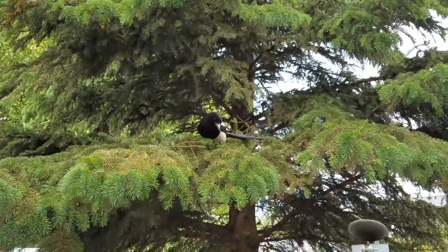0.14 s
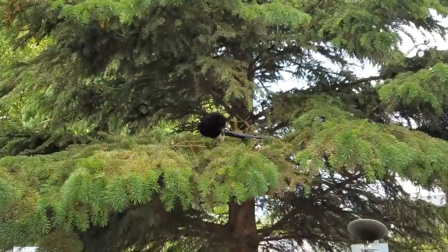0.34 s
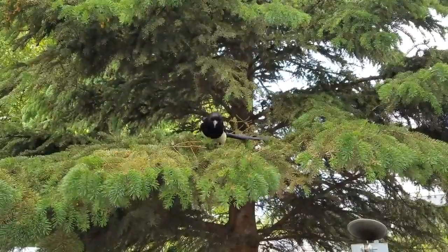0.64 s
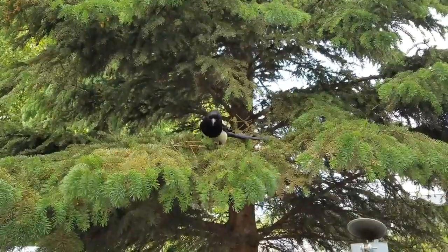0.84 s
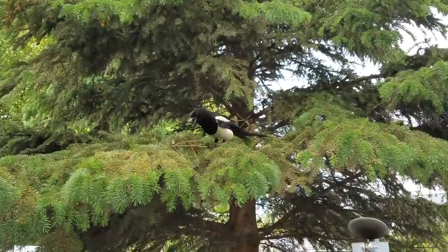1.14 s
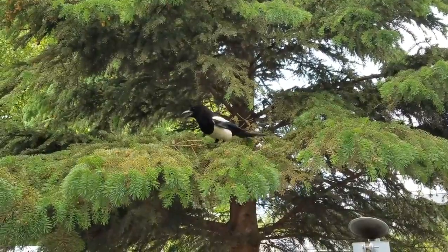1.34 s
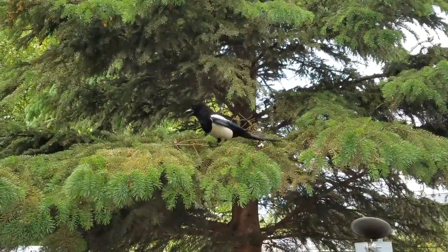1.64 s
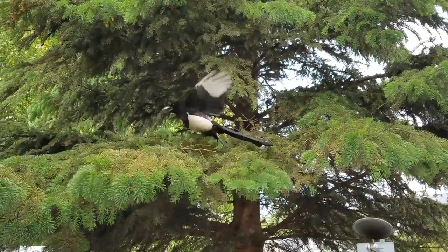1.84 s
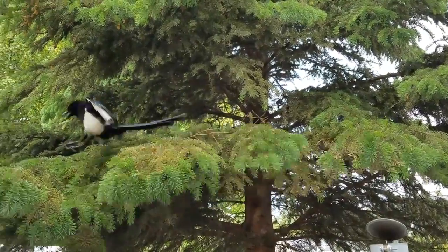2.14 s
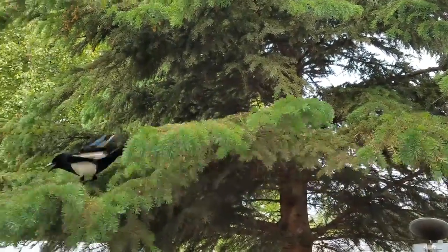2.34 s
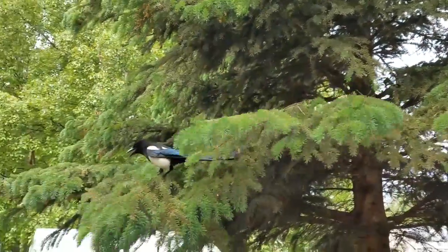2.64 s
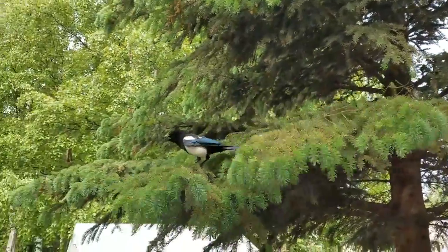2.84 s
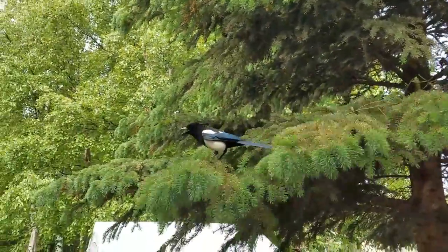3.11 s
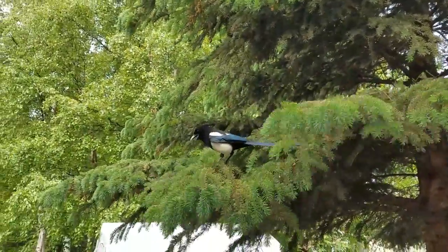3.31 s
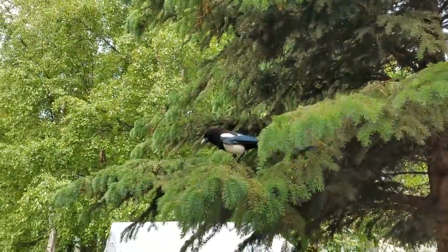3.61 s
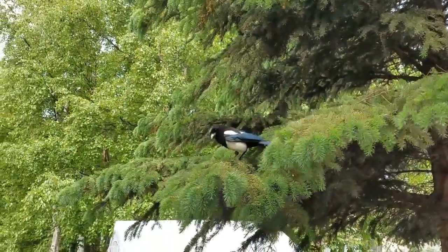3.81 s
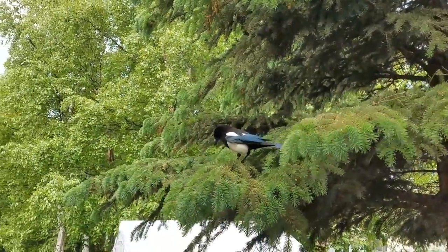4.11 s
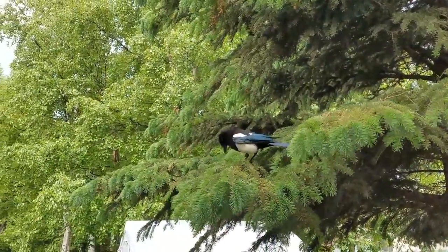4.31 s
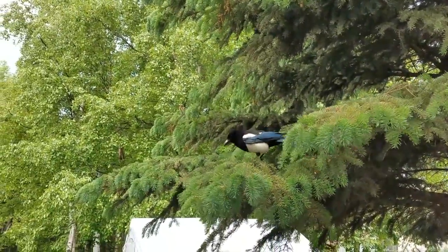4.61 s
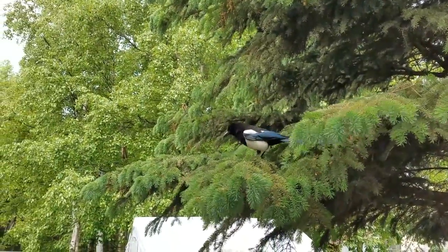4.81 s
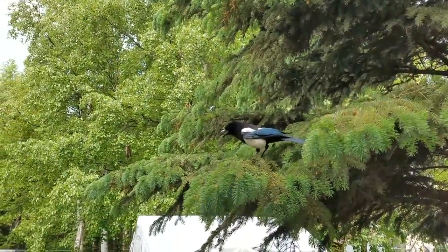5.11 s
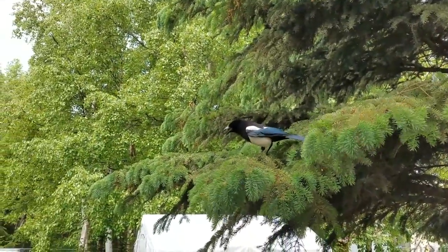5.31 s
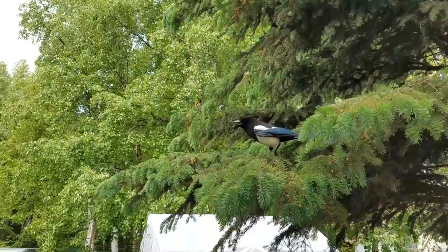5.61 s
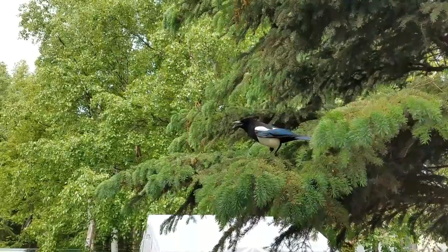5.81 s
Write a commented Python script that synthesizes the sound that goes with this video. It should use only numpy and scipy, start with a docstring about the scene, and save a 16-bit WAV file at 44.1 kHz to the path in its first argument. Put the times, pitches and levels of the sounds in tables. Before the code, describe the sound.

Quiet outdoor air with a faint low machine hum and a few tiny twig ticks. Soft breathy rasps begin just before a magpie breaks into eleven harsh, rattling calls at a steady quick pace. It stops for about a second and a half, leaving hum and background, then four more calls start and continue to the end. The microphone is at moderate distance in an open yard, with slight scatter from branches.

```python
"""A distant machine hums and twigs tick; soft rasps, perhaps from a second bird, soon join in.
Then a magpie chatters in a spruce: two runs of harsh calls, each a rattle rising into a hoarse tone.
Pulses and puffs of air drive throat resonances; the rasps use a breathier source, the ticks noise bursts.
Branches scatter the near sounds and the yard answers faintly as decaying reflections.
The machine is a bank of wavering tones, over an outdoor background of coloured noise."""
import sys
import numpy as np
from scipy import signal
from scipy.fft import rfft, irfft, next_fast_len
from scipy.io import wavfile
from scipy.ndimage import uniform_filter1d

SR = 44100
rng = np.random.default_rng(int(sys.argv[2]) if len(sys.argv) > 2 else 0)


def wav_out(sig):
    """Save sig, one row per channel (or a flat mono array), as 16-bit PCM at SR to the path in sys.argv[1]."""
    wavfile.write(sys.argv[1], SR, np.round(np.clip(np.atleast_2d(sig).T, -1, 1) * 32767).astype(np.int16))


N = 262395
TIME = np.arange(N) / SR
CALL_TIME = np.arange(0, .24, 1 / SR)

# The magpie's calls. Each row: start in seconds, build-up time of the air pressure in seconds,
# time to the top of the pitch in seconds, level in dB before scattering, treble in dB,
# top pitch in Hz, beak opening as a factor on the throat's resonances.
CALLS = [ (1.071, 0.02, 0.15, -18.5, -0.7, 587, 1.018), (1.306, 0.021, 0.15, -18.5, -2, 693, 0.9942),
         (1.544, 0.03, 0.14, -18, -5, 712, 0.99), (1.762, 0.023, .129, -18, -2.5, 733, 1.016),
         (1.971, 0.026, .130, -19, -1, 742.5, 0.978), (2.221, 0.015, 0.13, -20.5, -1.2, 774, 1.0),
         (2.460, .019, .133, -19, -0.9, 737, .99), (2.683, 0.018, 0.13, -19.5, 0, 759, 0.986),
         (2.911, 0.022, 0.13, -17.5, -0.8, 751, 1), (3.144, 0.02, .120, -18, -0.7, 774, 1),
         (3.382, 0.02, .119, -17.5, -1, 785.7, 1.028), (5.088, 0.038, 0.14, -18.5, -1.4, 646, 0.98),
         (5.319, 0.023, 0.13, -18.5, -1.5, 689, 1), (5.535, 0.023, 0.12, -18, -0.5, 749, 1.008),
         (5.771, 0.021, .120, -18.5, -1, 724.4, 1), ]
# Resonances of the throat, fixed during a call. Each row: frequency in Hz before the beak factor,
# width in Hz, relative level in dB.
THROAT_MODES = [(590, 260, -9.5), (1480, 450, -7), (2350, 700, -4), (5000, 1150, -2.5), (6300, 1400, -15),
                (8150, 1500, -8), (11100, 1500, -25), (14400, 1500, -29)]
# Resonances that move with the beak. Each row: resting frequency in Hz before the beak factor,
# harmonic that pulls it up (multiple of the pitch), width in Hz, relative level in dB at the
# start of the climb, relative level in dB at its top.
BEAK_MODES = [(982, 1, 520, -11, -36), (1904, 1.2, 596, 4, -5), (2687, 3.82, 365, 6, 4.5),
              (2700, 6.56, 1100, -16, -5)]
# The second voice. Each row: loudest moment in seconds, level in dB before scattering.
RASP_CALLS = [(0.861, -38), (1.078, -35), (1.282, -32), (1.51, -33), (1.737, -32.5), (1.944, -32.5),
              (2.178, -31), (2.414, -31), (2.65, -33), (2.862, -32.5), (3.679, -58.5)]
# Its throat with the beak nearly shut. Each row: frequency in Hz, width in Hz, relative level in dB.
RASP_SHUT_MODES = [(1472, 280, -3), (1870, 700, 5), (3070, 310, -3), (5100, 3300, -18), (7430, 3300, -21),
                   (10200, 2200, -27)]
# Its throat with the beak open. Each row: frequency in Hz, width in Hz, relative level in dB.
RASP_OPEN_MODES = [(1820, 1900, -2.5), (2660, 460, -7), (2943, 760, 1.5), (4900, 1130, -2.5),
                   (6650, 3300, -9.5), (10440, 1500, -14.5), (13800, 1200, -21.5)]
# Twig ticks. Each row: start in seconds, level in dB before decay and scattering, centre in Hz,
# decay time constant in seconds.
TWIG_TICKS = [(.049, -42, 6270, 0.0042), (.415, -53, 5300, .003), (.486, -57, 9000, 0.021),
              (0.5632, -28, 7920, 0.0011), (.617, -50, 8400, .009), (4.52, -56.5, 8500, 0.026),
              (4.575, -55, 8400, 0.029)]
# Stereo balance of the near sounds. Each row: frequency in Hz, left minus right in dB.
STEREO_LEAN = [(400, 3), (1000, 3.5), (1700, 8.5), (2200, 3), (2700, -2), (3600, -5.5), (4800, -14),
               (6200, -3), (8000, -10.5), (9500, -2.5), (13000, -2)]
# Decay of the scatter in the branches. Each row: frequency in Hz, time to fall 60 dB in seconds.
BRANCH_DECAY = [(500, 0.099), (3000, 0.13), (12000, 0.17)]
# Decay of the yard's answer. Each row: frequency in Hz, time to fall 60 dB in seconds.
YARD_DECAY = [(500, 0.93), (2500, 0.75), (6000, 0.64), (12000, 0.41)]
# Hum of the machine. Each row: mean frequency in Hz, level in dB, wavering share (0-1).
HUM_TONES = [(122, -45, 0.164), (153, -62, 0.5), (301.4, -65, 0.36)]
# Surges of the drone. Each row: start in seconds, length in seconds, gain in dB.
DRONE_SURGES = [(3.45, 0.69, 8), (4.33, 0.79, 11)]
# Whine of the machine. Each row: multiple of the shaft rate, relative level in dB.
WHINE_ORDERS = [(8, -9), (9, -2), (10, -6), (11, -1), (12, 0), (16, -17), (18, -17), (24, -12), (25, -18),
                (28, -14)]
# Loudness curve of the whine. Each row: time in seconds, gain in dB.
WHINE_LOUDNESS = [(0, -53), (.4, -59.5), (3.4, -54.5), (4.05, -51.5), (4.8, -51), (5.95, -52.5)]
# Spectrum of the outdoor background. Each row: frequency in Hz, relative density in dB per Hz.
AIR_SPECTRUM = [(12, -33), (25, -14), (40, -12), (60, -8), (105, -9), (210, -11), (380, -15), (600, -12),
                (1000, -16), (1550, -14.5), (2100, -19), (3000, -27), (6000, -40.5), (10500, -49.5),
                (15500, -47)]
# Likeness of the background at the two ears. Each row: frequency in Hz, correlation (0-1).
AIR_LIKENESS = [(60, 0.893), (180, 0.89), (550, 0.52), (800, 0)]

# source: spread of one snap of the membranes, and the upper limit of the band
CLOSING_S, EDGE_HZ = .0025, 15800
LOW_CUT_HZ = 497  # a small throat radiates little below this
BEAK_SPLIT_HZ = 3800  # body below, treble above
# a call starts abruptly, swells with the air pressure, holds just past the top and dies away
ATTACK_S, ONSET_DB, HOLD_S, RELEASE_DB_PER_S = 0.0052, -15, .003, 561
# the pitch creeps up during the rattle, then climbs over the last CLIMB_SHARE of the way and collapses
START_HZ, BREAK_HZ, CLIMB_SHARE, FALL_HZ_PER_S = 348.2, 485.5, .47, 7000
# hoarseness (0-1): the voice is clearest shortly before the top of the pitch
HOARSE_ENDS, HOARSE_CLEAR, CLEAR_LEAD_S, CLEAR_WIDTH_S = .68, 0.15, .018, 0.054
# the treble is down with the beak nearly shut and flares as it gapes, just before the top
SHUT_DB, GAPE_LEAD_S, GAPE_WIDTH_S = -9, 0.018, 0.034
BLOOM_S = 0.0072  # the treble builds up after the body
# each rasp fades in, swells to its loudest and drops away
RASP_ATTACK_S, RASP_SWELL_S, RASP_SWELL_DB, RASP_RELEASE_DB_PER_S = 0.031, .153, 5.5, 300
SHAFT_HZ = 61.0  # mean rate
# a deeper drone that beats against the hum; its base level, and the time to surge or sink
DRONE_HZ, DRONE_DB, SURGE_RAMP_S = 99.2, -57.5, .1
AIR_DB = -45.5


def call(start, swell, climb_end, level_db, treble_db, top_hz, opening):
    """Source and filter: as the pitch climbs the voice clears, the beak gapes, and the end is hoarse."""
    t = CALL_TIME
    climb = [climb_end * (1 - CLIMB_SHARE), climb_end]
    past_top = np.maximum(t - climb_end - HOLD_S, 0)

    def before_top(lead, width):
        """Gaussian weighting centred a lead before the top of the pitch."""
        return np.exp(-((t - climb_end + lead) / width) ** 2)

    rising_hz = np.interp(t, [0, *climb], [START_HZ, BREAK_HZ, top_hz])
    hz = np.maximum(rising_hz - FALL_HZ_PER_S * past_top, START_HZ)
    rough = HOARSE_ENDS + (HOARSE_CLEAR - HOARSE_ENDS) * before_top(CLEAR_LEAD_S, CLEAR_WIDTH_S)
    source = syrinx(hz, rough, jitter=.06, rattle_hz=125, rattle=.6)

    # a wider beak lifts the whole throat
    modes = [(f * opening, width, db) for f, width, db in THROAT_MODES]
    for rest_hz, harmonic, width, start_db, top_db in BEAK_MODES:
        ring_hz = np.maximum(rest_hz * opening, harmonic * hz)
        modes.append((ring_hz, width, np.interp(t, climb, [start_db, top_db])))
    voice = colour(resonate(source, t, modes), lambda f: 1 / (1 + (LOW_CUT_HZ / (f + 1)) ** 4))

    body = colour(voice, lambda f: 1 / (1 + (f / BEAK_SPLIT_HZ) ** 20))
    bloom = 1 - np.exp(-(t / BLOOM_S) ** 2)
    gape_db = SHUT_DB * (1 - before_top(GAPE_LEAD_S, GAPE_WIDTH_S))
    treble_gain = bloom * amp(treble_db + gape_db)
    pressure_db = ONSET_DB * np.exp(-t / swell) - RELEASE_DB_PER_S * past_top
    envelope = (1 - np.exp(-(t / ATTACK_S) ** 2)) * amp(level_db + pressure_db)
    return start, envelope * (steadied(body) + treble_gain * steadied(voice - body))


def syrinx(hz, rough, jitter, rattle_hz, rattle):
    """Self-oscillation: jittered pulses and puffs of air, chopped by a slower uneven membrane flutter."""
    size = len(hz)
    turns = np.cumsum(hz * (1 + jitter * (.3 + rough) * wobble(size, 350))) / SR
    clicks = np.sinc((turns % 1 - .5) * EDGE_HZ * 2 / hz)
    # each snap is spread in time, high frequencies last
    pulses = colour(clicks, lambda f: np.exp(-1j * np.pi * CLOSING_S * f ** 2 / EDGE_HZ))
    # the air noise is strongest just after each snap
    puffs = rng.standard_normal(size) * (0.55 + np.exp(-((turns - .5) % 1) / 0.28))
    flutter_hz = rattle_hz * (1 + 0.403 * wobble(size, 110.6))
    flutter = np.cos(2 * np.pi * np.cumsum(flutter_hz) / SR)
    tonal = np.sqrt(1 - rough) * evened(pulses - pulses.mean())
    breathy = np.sqrt(rough) * evened(puffs)
    return (1 + rattle * flutter) * (tonal + breathy)


def resonate(x, t, modes):
    """Time-varying resonance: each mode (Hz, width, dB) follows its curve and delays its own band."""
    f, at, z = signal.stft(x, SR, nperseg=256, noverlap=192)
    power, lag = 0, 0
    for hz, width, db in modes:
        hz_now, db_now = (np.interp(t[0] + at, t, curve * np.ones(len(t))) for curve in (hz, db))
        detuning = 2 * (f[:, None] - hz_now) / width
        power = power + amp(db_now) ** 2 / (1 + detuning ** 2) ** 2
        lag = lag + 2 * np.arctan(detuning)
    shaped = z * np.sqrt(power) * np.exp(-1j * lag)
    return signal.istft(shaped, SR, nperseg=256, noverlap=192)[1][:len(x)]


def rasp():
    """Formant change: a breathy rattle swells and passes from shut-beak to open-beak resonances."""
    out, t = np.zeros(N), CALL_TIME
    opening = np.minimum(t / RASP_SWELL_S, 1)
    release_db = RASP_RELEASE_DB_PER_S * np.maximum(t - RASP_SWELL_S, 0)
    swell_db = RASP_SWELL_DB * (opening - 1) - release_db
    envelope = np.minimum(t / RASP_ATTACK_S, 1) * amp(swell_db)
    for peak_s, db in RASP_CALLS:
        source = syrinx(400 + 250 * opening, rough=.75, jitter=.07, rattle_hz=150, rattle=.5)
        shut = evened(throat(source, RASP_SHUT_MODES))
        wide = evened(throat(source, RASP_OPEN_MODES))
        voice = (1 - opening ** 2) * shut + opening ** 2 * wide
        add(out, peak_s - RASP_SWELL_S, amp(db) * envelope * steadied(voice))
    return out


def throat(x, modes):
    """Minimum-phase resonance: a causal filter with steep-sided peaks and a weak bass."""
    f = abs(np.fft.fftfreq(4096, 1 / SR))
    power = sum(amp(db) ** 2 / (1 + (2 * (f - hz) / width) ** 2) ** 2 for hz, width, db in modes)
    log_gain = np.log(power / (1 + (400 / (f + 1)) ** 6) + 1e-10) / 2
    # the Hilbert transform of the log gain gives the phase
    ring = np.fft.ifft(np.exp(np.conj(signal.hilbert(log_gain)))).real
    return signal.fftconvolve(x, ring[:len(f) // 2])[:len(x)]


def twigs():
    """Impulsive excitation: short dry ticks of twigs and needles, band noise with exponential decay."""
    out, t = np.zeros(N), np.arange(SR // 10) / SR
    for s, db, hz, decay in TWIG_TICKS:
        noise = rng.standard_normal(len(t))
        snap = evened(colour(noise, lambda f: np.exp(-(np.log((f + 1) / hz) / 0.5) ** 2)))
        add(out, s, amp(db) * snap * np.exp(-t / decay))
    return out


def through_branches(x, direct_db, scatter_db):
    """Multiple scattering: the straight path plus a fresh random scatter from the branches."""
    heard = amp(scatter_db) * echoes(x, BRANCH_DECAY, delay=.0003, size=6000)
    add(heard, 0, amp(direct_db) * x)
    return heard


def echoes(x, decays, delay, size):
    """Reverberation: sparse reflections, different at each ear, each band dying at its own speed."""
    taps = rng.choice([-1., 1.], (2, size)) * (rng.random((2, size)) < .1)
    hz, t, z = signal.stft(taps, SR, nperseg=256)
    decay = amp(-60 * t / read(decays, hz)[:, None])
    tail = signal.istft(z * decay, SR, nperseg=256)[1]
    tail = tail / np.linalg.norm(tail, axis=1, keepdims=True)
    tail = np.pad(tail, ((0, 0), (round(delay * SR), 0)))
    return signal.fftconvolve(x[None], tail, axes=1)


def machine():
    """Rotating sources: a hum, a drone, and a whine on shaft multiples that wavers through the air."""
    # all tones share one slight drift of speed, as a warped time in seconds
    warped = np.cumsum(1 + .0015 * wobble(N, 2)) / SR

    def tone(hz, waver):
        """A sine with a slowly fluctuating second component."""
        phase = 2 * np.pi * hz * warped
        return np.sin(phase) + waver * wobble(N, 7.9) * np.cos(phase + 0.55)

    surge_db = sum(db * ramps(TIME - s, length, SURGE_RAMP_S) for s, length, db in DRONE_SURGES)
    hum = sum(amp(db) * tone(hz, waver) for hz, db, waver in HUM_TONES)
    hum = hum + amp(DRONE_DB + surge_db) * tone(DRONE_HZ, waver=0.2)

    whine = np.zeros(N)
    for order, db in WHINE_ORDERS:
        level = amp(db) * (1 + 0.37 * wobble(N, 4.4))
        whine += level * np.sin(2 * np.pi * (order * SHAFT_HZ * warped + rng.random()))
    whine *= amp(follow(WHINE_LOUDNESS))
    # the hum leans slightly right, the whine left (dB)
    return np.sqrt(2) * (hum * amp([[-.5], [.5]]) + whine * amp([[2.5], [-2.5]]))


def ramps(t, length, ramp):
    """Trapezoidal envelope: rises from 0 to 1, holds, and is back at 0 after the length."""
    return np.clip(np.minimum(t, length - t) / ramp, 0, 1)


def air():
    """Partial coherence: distant rumble and leaf hiss as noise, most alike at both ears in the bass."""
    a, b = rng.standard_normal((2, N))
    shared = colour(a, lambda f: read(AIR_LIKENESS, f))
    separate = colour(b, lambda f: np.sqrt(1 - read(AIR_LIKENESS, f) ** 2))
    pair = np.array([a, shared + separate])
    noise = evened(colour(pair, lambda f: amp(read(AIR_SPECTRUM, f))))
    return amp(AIR_DB + 0.25 * wobble(N, 6)) * noise


def amp(db):
    """Logarithmic level: decibels to amplitude gain."""
    return 10 ** (np.asarray(db) / 20)


def evened(x):
    """Normalisation: scales to rms 1."""
    return x / np.sqrt(np.mean(x ** 2) + 1e-20)


def steadied(x):
    """Short-time normalisation: holds the level at 1 while keeping the fast rattle."""
    return x / np.sqrt(abs(uniform_filter1d(x ** 2, size=600)) + 1e-12)


def read(points, hz):
    """Interpolation of a table on a logarithmic frequency axis."""
    f, value = np.transpose(points)
    return np.interp(np.log(hz + 1), np.log(f), value)


def follow(points):
    """Interpolation of a curve at every sample."""
    return np.interp(TIME, *np.transpose(points))


def add(mix, s, sound):
    """Superposition: mixes a sound in at a time in seconds."""
    part = mix[..., round(s * SR):][..., :sound.shape[-1]]
    part += sound[..., :part.shape[-1]]


def colour(x, gain):
    """Linear filtering by a gain that is a function of frequency."""
    size = next_fast_len(x.shape[-1] + 2048)
    spectrum = rfft(x, size) * gain(np.fft.rfftfreq(size, 1 / SR))
    return irfft(spectrum, size)[..., :x.shape[-1]]


def wobble(size, hz):
    """Random modulation: smooth noise of rms 1 that fades out above about a given rate."""
    return evened(colour(rng.standard_normal(size), lambda f: np.exp(-(f / hz) ** 2)))


def scene():
    """Superposition: near sounds direct and scattered, the yard's answer, the machine and the air."""
    soft, ticks = rasp(), twigs()
    near, voices = np.zeros((2, N)), soft + ticks
    add(near, 0, through_branches(soft, direct_db=-9.5, scatter_db=7.5))
    add(near, 0, through_branches(ticks, direct_db=-9.5, scatter_db=-10))
    for row in CALLS:
        s, sound = call(*row)
        add(voices, s, sound)
        add(near, s, through_branches(sound, direct_db=-4.0, scatter_db=1.34))

    def lean_gain(f):
        """Power-preserving balance of left and right."""
        return np.sqrt(2 / (1 + amp(np.outer([-1, 1], read(STEREO_LEAN, f))) ** 2))

    yard = amp(-19.0) * echoes(voices, YARD_DECAY, delay=.025, size=40000)[:, :N]
    return colour(near, lean_gain) + yard + machine() + air()


def record(dry):
    """Band limitation: a linear-phase low-pass at the upper edge of the band."""
    low_pass = signal.firwin(511, EDGE_HZ, window=("kaiser", 9), fs=SR)
    return signal.oaconvolve(dry, low_pass[None], "same")


dry = scene()
out = record(dry)
wav_out(out)
```